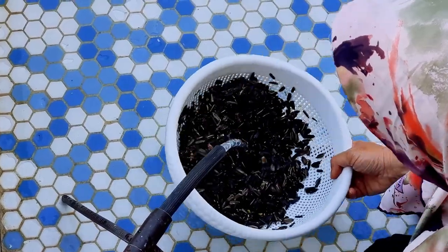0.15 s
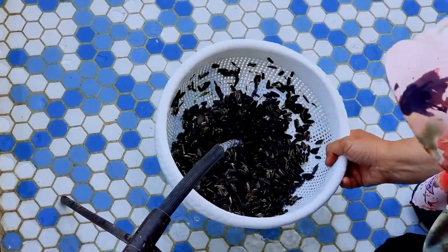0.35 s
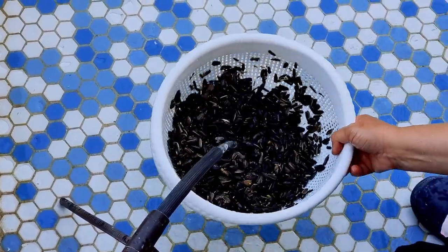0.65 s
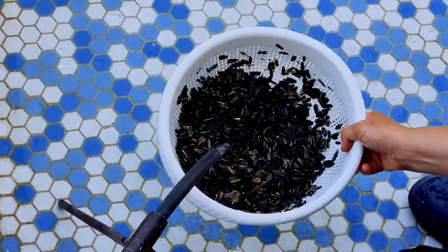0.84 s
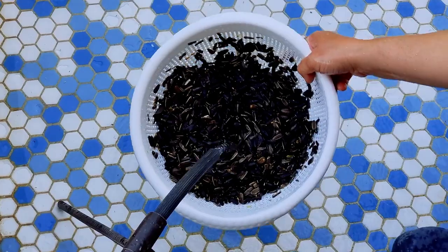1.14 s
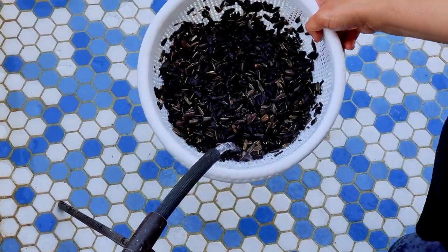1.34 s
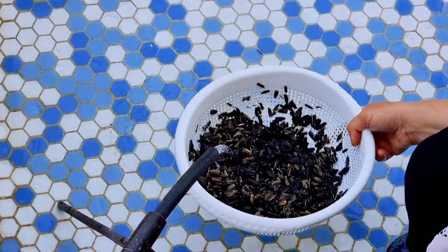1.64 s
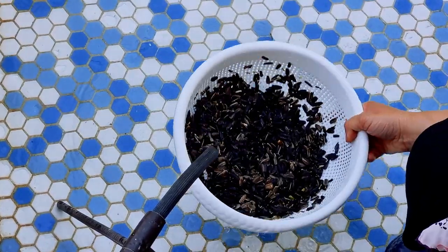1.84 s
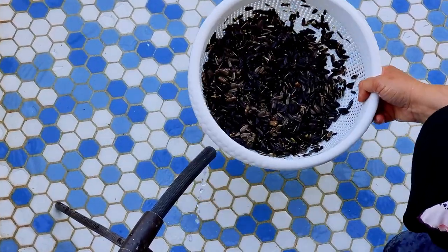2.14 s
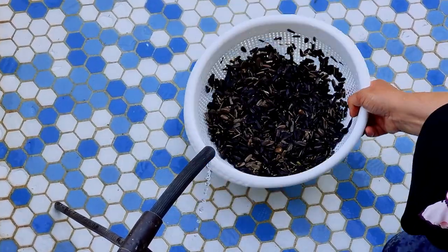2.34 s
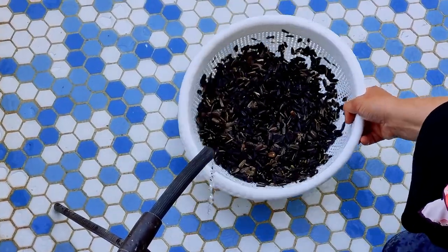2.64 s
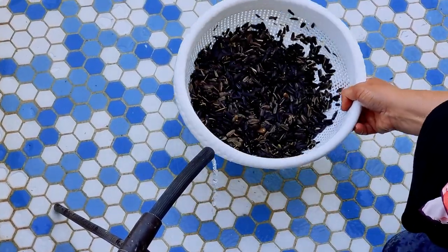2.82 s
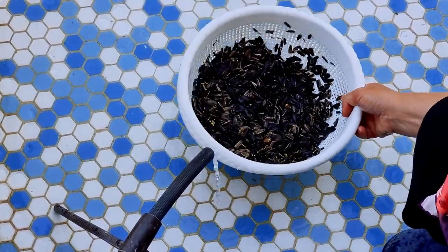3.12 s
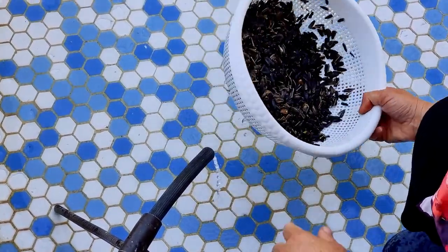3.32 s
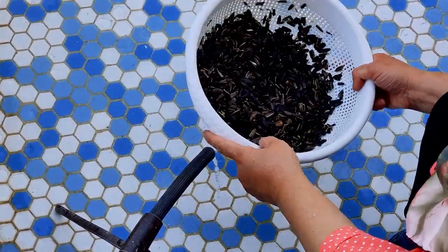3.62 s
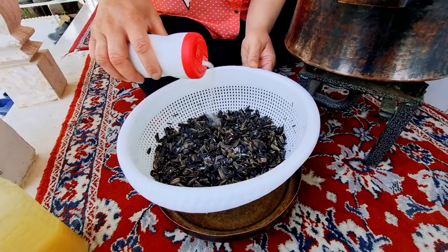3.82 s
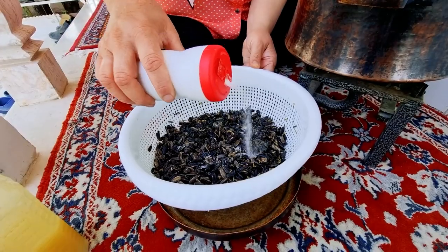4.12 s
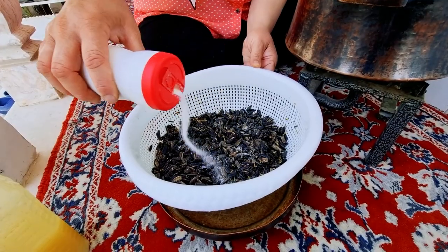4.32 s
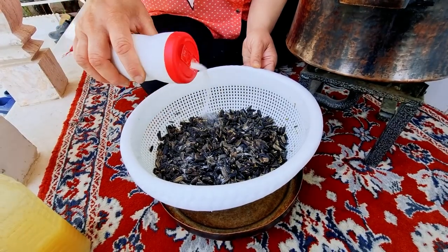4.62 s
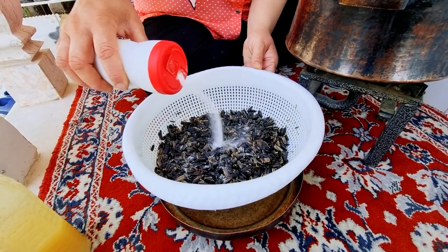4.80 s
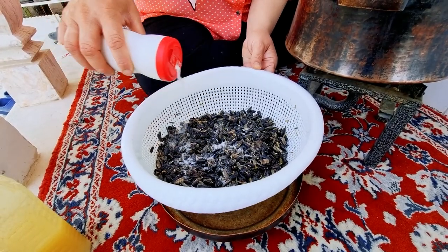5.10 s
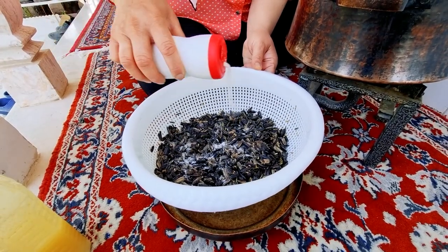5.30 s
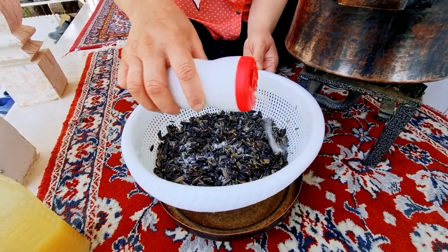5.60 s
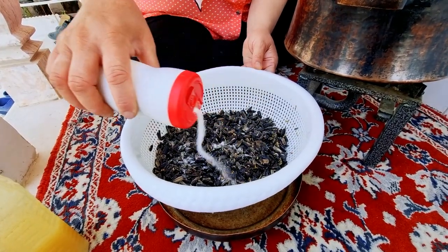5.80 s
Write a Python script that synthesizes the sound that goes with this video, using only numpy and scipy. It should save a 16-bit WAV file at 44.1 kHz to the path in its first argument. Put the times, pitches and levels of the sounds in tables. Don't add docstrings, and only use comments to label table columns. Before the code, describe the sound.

Close in a tiled yard, water fizzes over seeds sliding in a plastic colander, three hard knocks follow, then a bubbling pot and hissing poured salt.

```python
import sys
import numpy as np
from scipy import signal
from scipy.fft import rfft, irfft
from scipy.io import wavfile
from scipy.ndimage import uniform_filter1d

SR = 44100
rng = np.random.default_rng(int(sys.argv[2]) if len(sys.argv) > 2 else 0)


def inscribe(sig):
    pcm = np.round(np.clip(np.atleast_2d(sig).T, -1, 1) * 32767)
    wavfile.write(sys.argv[1], SR, pcm.astype(np.int16))


def gain_from_db(level_db):
    decades = np.asarray(level_db, float) / 20
    return 10 ** decades


N = 262395


def evened(x):
    return x / np.sqrt(np.mean(x ** 2) + 1e-20)


def read(points, hz):
    f, value = np.transpose(points)
    return np.interp(np.log(hz + 1), np.log(f + 1), value)


def level_db(curve):
    s, db = np.transpose(curve)
    return np.interp(np.arange(N) / SR, s, db)


def add(mix, s, sound):
    part = mix[round(s * SR):][:len(sound)]
    part += sound[:len(part)]


def coloured(x, spectrum):
    gain = gain_from_db(read(spectrum, np.fft.rfftfreq(len(x), 1 / SR)))
    return evened(irfft(rfft(x) * gain, len(x)))


def resonate(x, hz, width):
    radius = np.exp(-np.pi * width / SR)
    pole = np.exp(2j * np.pi * hz / SR)
    return 2 * signal.lfilter([1 - radius], [1, -radius * pole], x).real


def crackle(per_s, spread_db, tail_s):
    chance, size = rng.random(N) * SR / per_s, np.zeros(N)
    hit = chance < 1
    size[hit] = gain_from_db(spread_db * np.minimum(-np.log(chance[hit] + 1e-9), 3.5))
    power = signal.lfilter([1], [1, -np.exp(-1 / (tail_s * SR))], size ** 2)
    return evened(np.sqrt(power) * rng.standard_normal(N))


def patchy(spectrum, patchy_db, flicker_db):
    frames = N // 128 + 5
    a, b, patches = rng.standard_normal((frames, 257, 3)).T
    patches = uniform_filter1d(patches, size=14, axis=0)
    patches = evened(uniform_filter1d(patches, size=5, axis=1))
    flicker = evened(uniform_filter1d(rng.standard_normal(frames), size=3))
    z = (a + 1j * b) * gain_from_db(patchy_db * patches + flicker_db * flicker)
    return coloured(signal.istft(z, nperseg=512, noverlap=384)[1][:N], spectrum)


def puff(hz, width, t60, rise_s, hold_s=0, snap=0):
    t = np.arange(4000) / SR
    fall_db = -60 * np.maximum(t - hold_s, 0) / t60 - 250 * np.minimum(t, hold_s)
    drive = rng.standard_normal(len(t)) * gain_from_db(fall_db) * (1 - np.exp(-t / rise_s))
    drive[round(rise_s * SR)] += snap * np.sqrt(SR / width)
    sound = resonate(resonate(drive, hz, width), hz, width)
    return sound / abs(sound).max()


def shaking():
    # time in seconds, level in dB.
    flow = [(0, -38), (.19, -44), (.45, -46.5), (.9, -47.5), (1.02, -44.5), (1.41, -44), (1.6, -50),
            (1.95, -42), (2.12, -55), (3.1, -53.5), (3.53, -49.5), (3.75, -49)]
    # middle in seconds, length in seconds, sliding seeds in dB, spray in dB.
    shakes = [(0.114, 0.61, -43.5, -54), (0.253, 0.11, -35.5, -39.5), (0.323, 0.16, -37.5, -38.5),
              (0.399, 0.12, -24.5, -34), (0.504, 0.098, -26.5, -33), (0.591, 0.096, -37.5, -39.5),
              (0.659, 0.094, -39, -40.5), (0.747, 0.12, -33, -37), (0.796, 0.027, -48, -37),
              (0.856, 0.092, -42.5, -37), (0.963, 0.088, -39, -42), (1.105, 0.063, -59, -42),
              (1.658, 0.12, -46.5, -42.5), (1.78, 0.25, -45, -40.5), (1.987, .07, -65, -42),
              (2.069, 0.028, -58, -40), (2.154, 0.089, -72, -48.5), (3.624, 0.16, -63, -45),
              (3.736, 0.12, -43.5, -67)]
    sharp = 0.93
    t, flow_db = np.arange(N) / SR, level_db(flow)
    spray = gain_from_db(flow_db) ** 2
    slide = gain_from_db(-51.5 + 0.67 * (flow_db + 45.5)) ** 2
    for middle, length, seeds_db, spray_db in shakes:
        swell = np.cos(np.pi * np.clip((t - middle) / length, -.5, .5)) ** 2
        spray = spray + gain_from_db(spray_db) ** 2 * swell ** sharp
        slide = slide + gain_from_db(seeds_db) ** 2 * swell ** sharp
    return np.sqrt(spray), np.sqrt(slide)


def rinse():
    # pitch in Hz, density in dB per Hz.
    spray_colour = [(1470, -18), (2500, -5), (4850, -3.5), (6760, 1.5), (9640, 1.5), (11700, -3),
                    (14600, 4), (16000, -5), (16500, -18)]
    # pitch in Hz, density in dB per Hz.
    seed_colour = [(180, -56), (300, -11), (769, -6), (955, -3), (1060, -7), (1520, -1), (1910, -3.5),
                   (2160, -2.5), (3130, -1), (6990, -4.5), (12000, -24), (15600, -51.5), (22000, -120)]
    spray, slide = shaking()
    mist = np.zeros(N)
    for hz in np.geomspace(3500, 15000, num=6):
        mist += resonate(crackle(330, 3.3, 0.0005), hz, 0.29 * hz) / np.sqrt(hz)
    mist_left = np.where(np.arange(N) < 2.9 * SR, 1, 0.66)
    fizz = patchy(spray_colour, 4.5, 3.5) + 1.3 * coloured(mist, spray_colour) * mist_left
    ticks = np.zeros(N)
    for hz in np.geomspace(900, 9000, num=14):
        ticks += resonate(crackle(400, 3.8, 0.00031), hz, 0.22 * hz) / np.sqrt(hz)
    seeds = coloured(ticks, seed_colour) + 0.7 * patchy(seed_colour, 2.2, 1.2)
    seeds += 1.34 * resonate(seeds, 2230, 600)
    return spray * evened(fizz) + gain_from_db(-1.5) * slide * evened(seeds)


def drops():
    # start in seconds, peak in dB, pitch in Hz.
    tap_drops = [(0.0034, -12, 7400), (0.051, -24, 7130), (0.0918, -16.5, 7560), (0.159, -24.5, 6130),
                 (0.2294, -31, 7980), (0.23, -21, 6500), (0.2484, -23, 9080), (0.255, -17, 6490),
                 (0.2752, -17.5, 6910), (0.307, -15, 10500), (0.323, -14, 6900), (0.333, -11, 9100),
                 (0.381, -16, 6750), (0.3944, -23, 4580), (0.4064, -28, 4500), (0.4633, -24, 7500),
                 (0.476, -10.5, 7520), (0.4934, -14, 7350), (0.5094, -12.5, 7300), (0.528, -14, 6460),
                 (0.5601, -22, 6100), (0.5796, -25, 5940), (0.58, -18.5, 6490), (0.631, -21, 6540),
                 (0.672, -21, 7310), (0.7253, -14.5, 5600), (0.7474, -24, 6690), (0.7904, -18, 9300),
                 (0.802, -18, 6720), (0.8332, -10.5, 7300), (0.9495, -26, 7580), (1.02, -19.5, 7800),
                 (1.057, -19.5, 6350), (1.0827, -24, 7180), (1.0939, -19, 14500), (1.162, -26, 13200),
                 (1.184, -20.5, 6750), (1.2247, -11.5, 6600), (1.261, -18, 6950), (1.3142, -20, 12600),
                 (1.3446, -18, 6800), (1.3644, -22, 14100), (1.3992, -25, 13700), (1.4157, -22, 12300),
                 (1.4556, -28, 8110), (1.538, -22, 7750), (1.6317, -19, 14200), (1.7823, -21, 10500),
                 (1.8097, -25, 8520), (1.8941, -24, 7490), (1.9051, -23, 9210), (1.953, -25, 13100),
                 (1.963, -24, 7100)]
    # start in seconds, peak in dB, pitch in Hz.
    clacks = [(0.0425, -39, 4040), (0.0626, -30, 2780), (0.1035, -34, 1500), (0.2125, -32, 1500),
              (0.2125, -32, 2250), (0.24, -20, 2540), (0.3107, -24.5, 2630), (0.3317, -20.5, 3100),
              (0.3591, -22, 2280), (0.4754, -22, 2240), (0.4774, -15, 2440), (0.5042, -15.5, 2170),
              (0.5721, -25, 2660), (0.5894, -20.5, 3550), (0.665, -23, 3180), (0.708, -22, 1700),
              (0.7216, -18.5, 2600), (0.7517, -20.5, 1580), (0.8355, -22.5, 3700), (0.856, -26, 3410),
              (0.9067, -29, 2280), (0.9358, -34, 2300), (0.9478, -30, 2560), (0.9623, -25, 3250),
              (1.0326, -32, 4160), (1.058, -40, 2440), (1.095, -41, 2540), (1.1176, -27.5, 4360)]
    # start in seconds, peak in dB, start pitch in Hz,
    # pitch factor, length in seconds.
    gurgles = [(1.383, -39.5, 865, 1.4, 0.022), (1.4, -37.5, 1246, 1.14, 0.012),
               (1.521, -40, 1006, 1.16, 0.026), (1.539, -32.5, 1176, 1.34, 0.018),
               (1.67, -35.5, 1023, 1.06, 0.016), (1.689, -32, 1130, 1.35, 0.0097),
               (1.814, -35, 957, 1.24, 0.027), (1.832, -33.5, 1312, 1.13, 0.0324),
               (2.06, -37, 1036, 1.2, 0.015), (2.07, -44, 1600, 1.4, 0.0204),
               (3.718, -36, 988, 1.23, 0.024), (0.099, -38.5, 953, 1.3, 0.016)]
    # start in seconds, peak in dB, start pitch in Hz, length in seconds.
    small_bubbles = [(1.66, -31, 427, 0.0024), (1.668, -42.5, 330, 0.024), (1.735, -43, 2240, 0.027),
                     (1.809, -34.5, 2830, 0.0087), (1.876, -39, 2230, 0.026), (1.867, -36, 3180, 0.0087),
                     (1.99, -32, 2570, 0.0053), (2.082, -39.5, 2650, 0.0065), (2.105, -43, 2030, 0.013),
                     (2.231, -44, 1540, 0.0095), (2.238, -42, 5300, 0.011), (2.519, -35, 656, 0.0044),
                     (2.976, -46, 940, 0.019), (3.066, -43.5, 3060, 0.014), (3.099, -46, 2180, 0.0082),
                     (3.343, -41.5, 920, 0.0099), (3.571, -44.5, 1050, 0.016), (3.627, -37, 4420, 0.014),
                     (3.643, -42, 770, 0.0066), (3.69, -45, 1540, 0.015), (3.696, -43, 2140, 0.016),
                     (3.728, -39.5, 2290, 0.013)]
    # start in seconds, peak in dB, pitch in Hz.
    drips = [(2.0004, -27, 12900), (2.0557, -16.5, 7060), (2.064, -27, 7000), (2.117, -18.5, 6260),
             (2.138, -26, 8950), (2.2134, -32, 7350), (2.2514, -33, 14300), (2.2842, -22.5, 14400),
             (2.3381, -29.5, 10100), (2.39, -36, 10900), (2.5202, -18.5, 11500), (2.5546, -29, 8500),
             (2.6145, -35, 7330), (2.635, -34, 7100), (2.6968, -29, 9600), (2.8709, -36, 14500),
             (3.0255, -40, 6420), (3.042, -31, 5640), (3.2286, -38, 8400), (3.3817, -29, 12800),
             (3.5079, -32, 8420), (3.5588, -30, 14000), (3.6265, -21.5, 4240), (3.675, -29, 8250),
             (3.7214, -24, 6700)]
    out = np.zeros(N)
    for s, db, hz in clacks + [(2.519, -32, 2400), (1.996, -31, 3200)]:
        add(out, s - .0004, gain_from_db(db - 2.5) * puff(hz, 0.38 * hz, 0.019, 0.00038, 0.0017, 0.96))
    for s, db, hz in tap_drops + drips:
        tick = puff(13500, 6000, 0.009, .0002, snap=3)
        smack = puff(hz, 0.39 * hz, 0.023, 0.0003, snap=1.7) + 0.9 * tick
        add(out, s - .0004, gain_from_db(db - 1.86) * smack)
    small_bubbles = [(s, db, hz, 1.05, length) for s, db, hz, length in small_bubbles]
    for s, db, hz, rise, length in gurgles + small_bubbles:
        u = np.arange(0, 1, 1 / (length * 1.67 * SR))
        wobble = .4 * evened(uniform_filter1d(rng.standard_normal(len(u)), size=60))
        swell = np.sin(np.pi * u ** 0.53) ** 2.6 * (1 + wobble)
        pitch = hz * rise ** (1.53 * u) * (1 + .03 * wobble)
        add(out, s, gain_from_db(db - 1.2) * swell * np.sin(2 * np.pi * np.cumsum(pitch) / SR))
    return out


def knocks():
    # start in seconds, peak in dB, thump in dB, brightness in dB,
    # hollow body in dB, relative length of the clatter.
    blows = [
        (2.435, -3, -34, 0.5, 1.5, 0.99),
        (2.777, -1, -31.5, 2, -3.5, 1.1),
        (3.135, -1, -37.5, 5.5, -15.5, 1.18),
    ]
    # pitch in Hz, level in dB, t60 in seconds.
    rim = [(81.7, 2, 0.14), (177.4, 1.5, 0.09), (1152, -3.5, 0.033), (584, -14, 0.069), (1288, 2, 0.015),
           (1600, -2, 0.016), (1984, -15, 0.094), (2650, 5, 0.021), (3720, -11.5, 0.02),
           (4490, -16.5, 0.014), (5000, -31.5, 0.015), (1096, -14, 0.074), (1620, -11.5, 0.066),
           (2790, -17.5, 0.074)]
    # pitch in Hz, density in dB per Hz.
    clatter_colour = [(120, -46), (200, -13.5), (254, -10.5), (503, -14.5), (1270, -8), (2700, -11),
                      (3020, -12.5), (4130, -16.5), (14800, -41), (16500, -33)]
    # pitch in Hz, t60 in seconds.
    clatter_t60 = [(200, 0.043), (1500, 0.19), (4000, 0.21), (10000, 0.14)]
    out, t = np.zeros(N), np.arange(12000) / SR
    for s, db, thump_db, bright_db, body_db, linger in blows:
        modes = []
        for hz, mode_db, t60 in rim:
            fall = gain_from_db(mode_db + rng.uniform(-1.6, 2.6) - 60 * t / t60)
            modes.append(fall * np.sin(2 * np.pi * hz * t))
        thump = sum(modes[:2]) * (1 - np.exp(-t / 0.0025))
        thump /= 1 + (t / .045) ** 10

        hz, at, z = signal.stft(coloured(rng.standard_normal(len(t)), clatter_colour), SR, nperseg=128)
        z = z * gain_from_db(-60 * at / linger / read(clatter_t60, hz)[:, None])
        clatter = signal.istft(z, SR, nperseg=128)[1][:len(t)]
        clatter *= 1 + 2.7 * gain_from_db(-60 * t / 0.036) + 0.79 * np.exp(-((t - .011) / 0.0053) ** 2)
        clatter *= gain_from_db(1.8 * evened(uniform_filter1d(rng.standard_normal(len(t)), size=150)))

        crack = puff(7000, 4600, 0.083, 0.00042) + 0.4 * puff(14000, 7000, 0.025, .0002)
        crack = gain_from_db(bright_db - 15) * crack - 1.15 * puff(2530, 3000, 0.01, 0.0009, snap=8.0)
        blow = (0.5 * sum(modes[2:]) + 0.099 * clatter) * (1 - np.exp(-(t / 0.0011) ** 2))
        blow[:len(crack)] += crack
        blow += (gain_from_db(body_db) - 1) * resonate(blow, 574, 410)
        blow = blow / abs(blow).max() + gain_from_db(.5 * thump_db - 6.5) * thump
        add(out, s + 0.00045, gain_from_db(db) * blow)
    return out


def bursting_bubbles(heat_db):
    # pitch in Hz, density in dB per Hz.
    simmer_colour = [(15, -54), (25, -14), (69, -15), (230, 14.5), (431, -21), (487, -6), (650, -7),
                     (934, -6), (1480, -2.5), (1670, -0.5), (2900, -10), (8000, -19.5), (10400, -55),
                     (17600, -120)]
    # start in seconds, peak in dB, pitch in Hz.
    large = [(3.819, -16, 490), (3.952, -11, 1140), (4.028, -14, 567), (4.544, -8, 506), (4.13, -7.5, 937),
             (4.209, -14.5, 1190), (4.241, -16.5, 490), (4.438, -9, 950), (4.444, -11.5, 330),
             (4.49, -10.5, 1160), (4.534, -6.5, 937), (4.594, -19.5, 493), (4.729, -10.5, 937),
             (4.751, -13, 1140), (4.857, -12, 1250), (4.987, -10.5, 930), (5.11, -12.5, 1100),
             (5.127, -6, 1000), (5.165, -11, 1140), (5.198, -8, 890), (5.23, -9.5, 810), (5.298, -12, 890),
             (5.369, -14, 626), (5.404, -7, 1140), (5.502, -9.5, 1140), (5.618, -5, 804),
             (5.708, -11.5, 970), (5.742, -15.5, 930), (5.854, -18, 1140), (5.935, -11, 950)]
    # start in seconds, peak in dB, pitch in Hz.
    small = [(3.845, -14, 2060), (3.9238, -19, 1900), (4.053, -18.5, 1760), (4.1742, -20.5, 1740),
             (4.2245, -12.5, 1620), (4.36, -12.5, 1620), (4.374, -15.5, 1650), (4.411, -28, 2520),
             (4.5283, -15, 1780), (4.5486, -14.5, 1700), (4.63, -11.5, 1540), (4.6595, -13.5, 1850),
             (4.6727, -13, 1820), (4.7099, -17.5, 1930), (4.7418, -16, 1820), (4.8257, -14.5, 2420),
             (4.9115, -13, 1700), (4.936, -16, 1600), (4.99, -21, 1600), (5.0184, -14, 1740),
             (5.066, -23, 2290), (5.253, -12.5, 1620), (5.454, -20, 1900), (5.462, -15, 1700),
             (5.488, -11, 1700), (5.521, -8, 1820), (5.6032, -16.5, 2490), (5.672, -14, 1860),
             (5.858, -17, 1740), (5.9219, -13.5, 2290), (4.329, -31, 1500), (4.764, -17, 1700),
             (5.358, -36, 1480), (5.371, -19, 1790), (5.422, -24, 1500), (5.56, -26, 1900),
             (5.581, -22, 1300), (5.64, -17.5, 1700), (5.687, -19, 1600), (5.779, -20.5, 1900),
             (5.282, -25, 2200), (3.906, -21.5, 1400), (3.878, -24, 1500), (4.009, -23.5, 1300),
             (4.078, -21.5, 1140), (4.091, -22.5, 1910), (4.278, -24, 1600), (4.882, -20.5, 1510),
             (4.95, -17.5, 1390), (5.142, -17.5, 1390), (5.186, -17, 1300), (5.212, -20, 990),
             (5.313, -25, 1100), (4.563, -14, 1500), (4.452, -17, 1500), (4.8, -28, 1300), (5.0, -22, 1040),
             (5.243, -24, 955), (5.876, -23, 1700), (5.757, -27, 2200)]
    # start in seconds, peak in dB, pitch in Hz.
    smallest = [(3.826, -23.5, 2750), (3.845, -27, 2620), (3.931, -22, 2750), (4.0124, -36, 2780),
                (4.0743, -35, 4200), (4.0897, -34, 2700), (4.1307, -29, 3180), (4.174, -23.5, 2770),
                (4.2095, -36, 2590), (4.2773, -28.5, 3460), (4.3347, -34, 2640), (4.3581, -25, 3150),
                (4.3931, -27, 2540), (4.412, -19, 2600), (4.435, -36, 4690), (4.4494, -30, 3800),
                (4.5075, -23, 3570), (4.5896, -21.5, 3190), (4.6107, -24, 2730), (4.6589, -28, 2580),
                (4.7084, -25, 2470), (4.7433, -23, 2610), (4.802, -27, 2770), (4.8266, -24, 2570),
                (4.909, -32, 3010), (4.9882, -24, 3600), (5.0311, -27.5, 3120), (5.0685, -27.5, 2990),
                (5.1104, -29, 4170), (5.1294, -39, 2760), (5.1618, -31, 2750), (5.2242, -34, 2540),
                (5.2815, -40, 2590), (5.3115, -40, 3120), (5.3614, -28, 2780), (5.4766, -20.5, 2500),
                (5.521, -42, 3600), (5.5599, -39, 2770), (5.5797, -26, 2660), (5.6078, -22, 2540),
                (5.6716, -29, 2660), (5.7071, -41, 3100), (5.745, -35, 3000), (5.7787, -33, 2530),
                (5.8009, -31, 2520), (5.8153, -25.5, 3540), (5.8956, -29, 2580), (5.922, -24, 4190)]
    grains = np.zeros(N)
    for hz in np.geomspace(450, 3600, num=8):
        grains += resonate(crackle(60, 2.6, .003), hz, .3 * hz) / np.sqrt(hz)
    clicks = .8 * crackle(130, 3.0, .003)
    bursts = gain_from_db(heat_db - 4.0) * coloured(evened(grains) + clicks, simmer_colour)
    for s, db, hz in large:
        pop = puff(hz, hz, 0.046, 0.00054, 0.008, 0.64) + 0.4 * puff(330, 380, 0.13, 0.0005, 0.0033, 0.41)
        add(bursts, s - .0012, gain_from_db(db - 6.0) * pop)
    for s, db, hz in small:
        pop = puff(hz, 0.33 * hz, 0.04, 0.00065, 0.0061, 0.99)
        pop += 0.54 * puff(1520, 1900, 0.021, .0005, 0.0028, 0.2)
        add(bursts, s - .0009, gain_from_db(db - 2.5) * pop)
    for s, db, hz in smallest:
        snap = puff(hz, 0.17 * hz, 0.031, .0004, 0.0014, 0.64) + .45 * puff(3000, 3000, 0.0086, .0003, snap=1.9)
        add(bursts, s - .0005, gain_from_db(db - 1.5) * snap)
    bursts = signal.sosfilt(signal.butter(2, 230, "high", fs=SR, output="sos"), bursts)
    fine = np.zeros(N)
    for hz in np.geomspace(2600, 4100, num=5):
        fine += resonate(resonate(crackle(18, 3.7, 0.013), hz, 0.14 * hz), hz, 0.15 * hz)
    return bursts + gain_from_db(-48.5) * evened(fine)


def pot():
    # time in seconds, level in dB.
    heat = [(3.82, -31), (4.0, -37), (4.2, -34), (4.36, -29.5), (4.75, -31), (5.2, -35.5), (5.45, -29),
            (5.8, -33), (5.95, -29)]
    # pitch in Hz, width in Hz, level in dB.
    wall_modes = [(219.2, 27, -16), (490, 23, 5), (937, 25, 11), (1140, 125, -3), (1700, 55, -3.5),
                  (2290, 39, 1), (3190, 36, -14), (4170, 18, -46), (4700, 66, -1)]
    # pitch in Hz, density in dB per Hz.
    flame_colour = [(30, -12), (70, -1), (150, 0), (400, 1.5), (900, -68)]
    heat_db = level_db(heat)
    bursts = bursting_bubbles(heat_db)
    wall = 0.69 * bursts
    for hz, width, db in wall_modes:
        wall += gain_from_db(0.62 * db + 1.5) * resonate(bursts, hz, width)
    hz, width = wall_modes[0][:2]
    low = evened(resonate(resonate(rng.standard_normal(N), hz, .5 * width), hz, 3 * width))
    rumble = gain_from_db(-39.5 + 2.5 * (heat_db + 32)) * low
    return wall + gain_from_db(-4.5) * rumble + gain_from_db(-39) * patchy(flame_colour, 2.2, 0.3)


def salt():
    # pitch in Hz, density in dB per Hz.
    salt_colour = [(1760, -52), (3000, -5), (5500, -2.5), (9260, -3.5), (11100, -7.5), (15000, -5),
                   (16100, -7), (16500, -49)]
    # start in seconds, peak in dB.
    clumps = [(3.9424, -35), (4.358, -31.5), (4.6289, -34), (4.8888, -34), (5.577, -31.5), (5.7016, -32)]
    out = gain_from_db(-45) * patchy(salt_colour, 1.94, 0.99)
    for s, db in clumps:
        add(out, s, gain_from_db(db) * puff(10400, 7000, 0.087, 0.0047))
    return out


def yard_echo(wet):
    echo = rng.standard_normal(3000) * gain_from_db(-60 * np.arange(3000) / SR / 0.23)
    echo = np.pad(echo / np.linalg.norm(echo), (90, 0))
    return gain_from_db(-12.0) * signal.oaconvolve(wet, echo)[:N]


def distant_machine():
    hz, width = 204.6, 13.6
    return gain_from_db(-63.5) * evened(resonate(resonate(rng.standard_normal(N), hz, width), hz, width))


def scene():
    # pitch in Hz, density in dB per Hz.
    yard_colour = [(15, -57), (25, -20), (70, 3), (111, -8), (202, -9), (445, -9.5), (584, -10),
                   (651, -13.5), (926, -12), (1150, -14), (1510, -16), (1730, -16), (3150, -24),
                   (14000, -24), (16500, -58)]
    yard_end_s, pot_start_s = 3.747, 3.8202
    t = np.arange(N) / SR
    wet = rinse() + drops() + knocks()
    yard = wet + yard_echo(wet) + gain_from_db(-51) * patchy(yard_colour, 0.52, 0.2) + distant_machine()
    return (yard * (t < yard_end_s) + (pot() + salt()) * (t > pot_start_s))[None]


def low_pass(x):
    return signal.sosfilt(signal.butter(12, 16640, fs=SR, output="sos"), x)


def record(dry):
    thin = signal.sosfilt(signal.butter(3, 55, "high", fs=SR, output="sos"), dry)
    band = signal.firwin(255, 15850, window=("kaiser", 6), fs=SR)
    limited = signal.oaconvolve(thin, band[None], "same")
    finished = np.clip(limited, -1, 1)
    return low_pass(finished)


dry = scene()
out = record(dry)
inscribe(out)
```